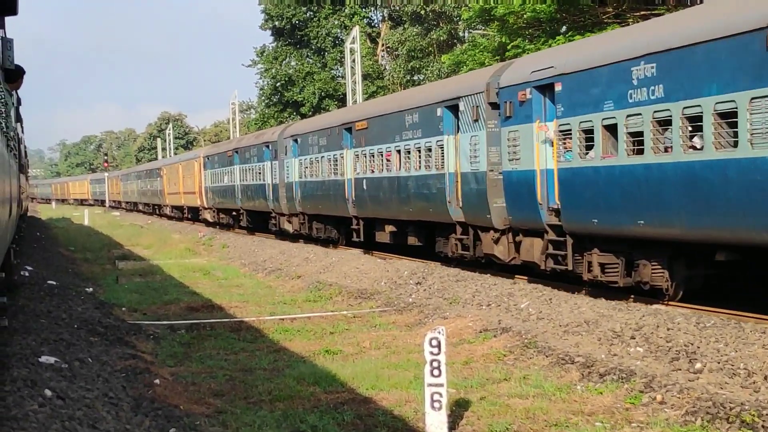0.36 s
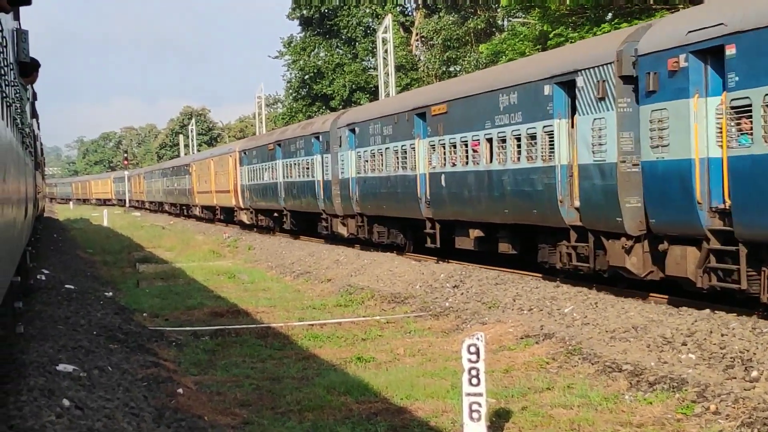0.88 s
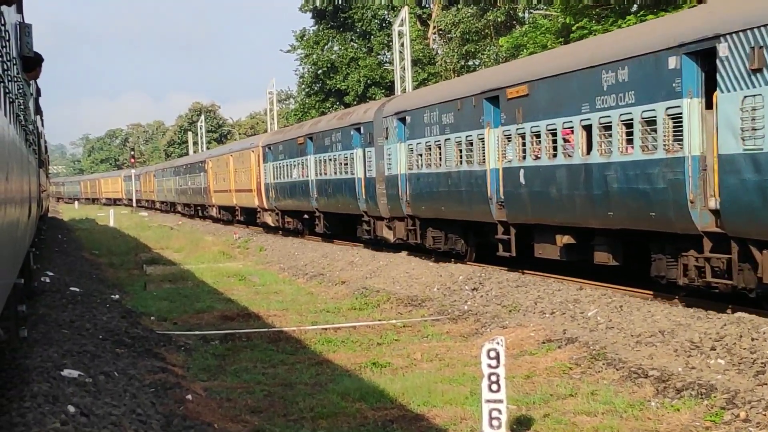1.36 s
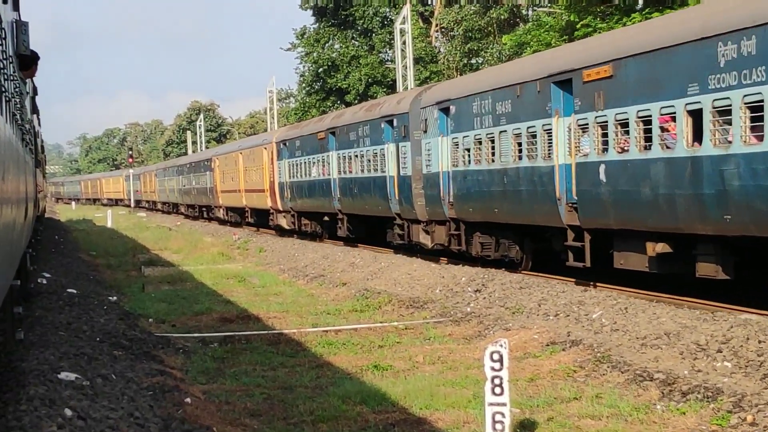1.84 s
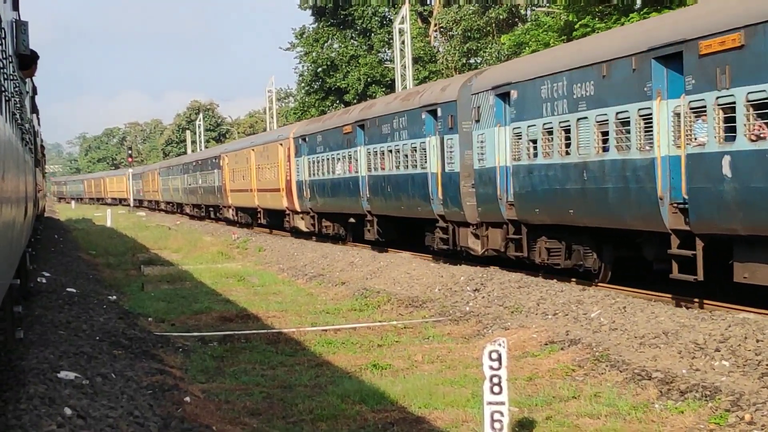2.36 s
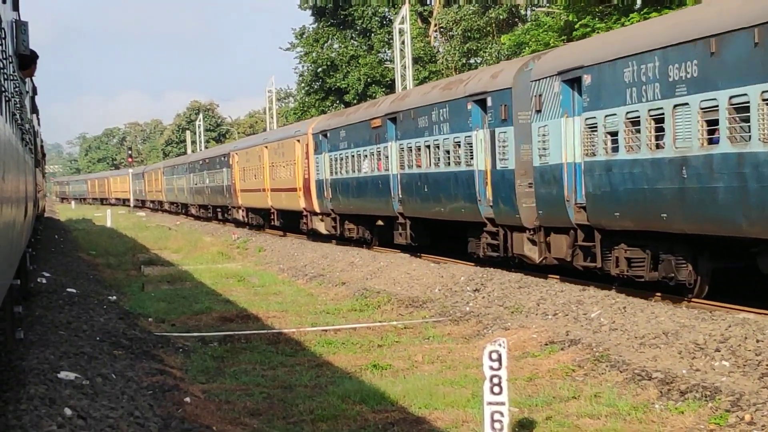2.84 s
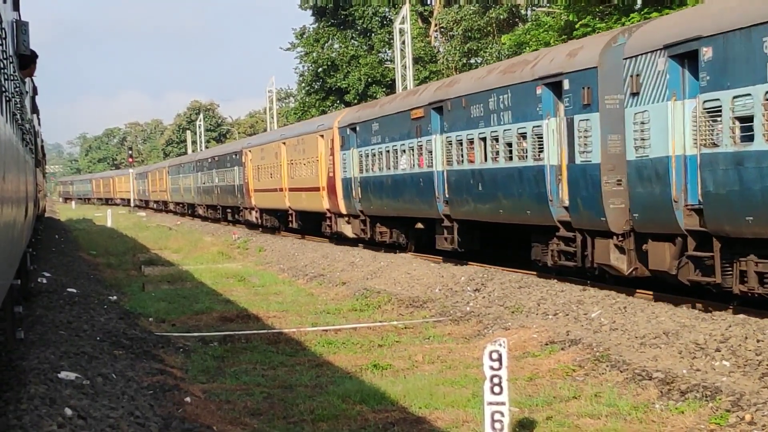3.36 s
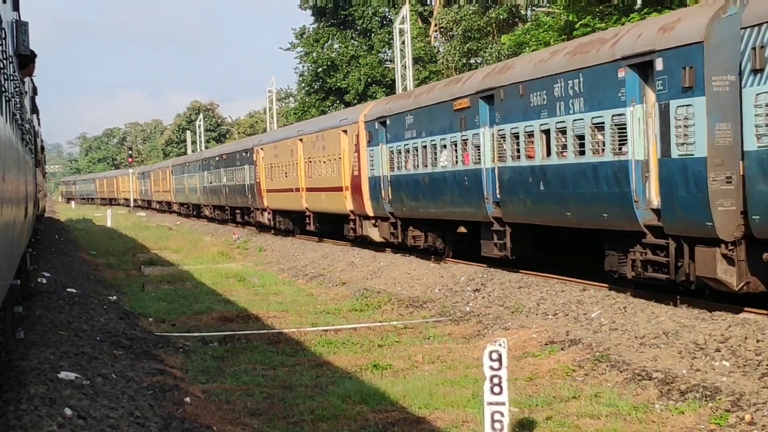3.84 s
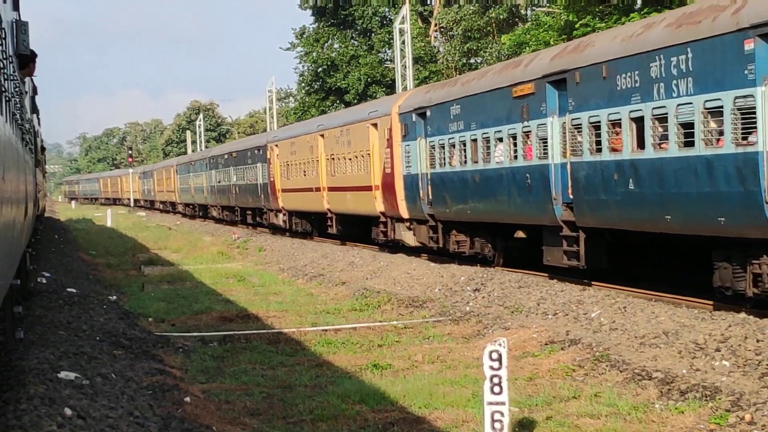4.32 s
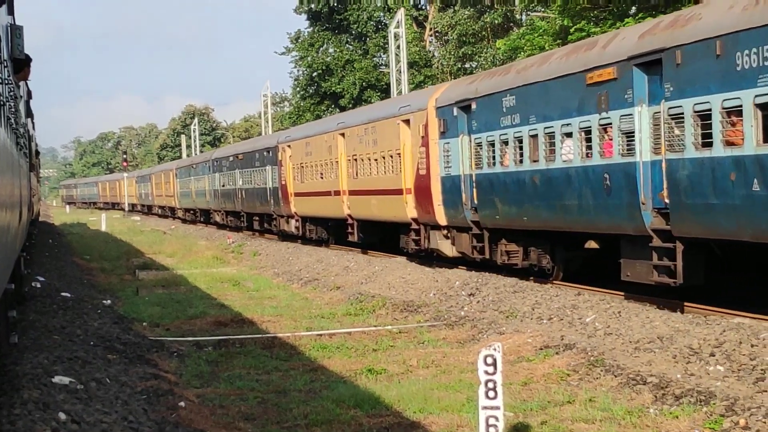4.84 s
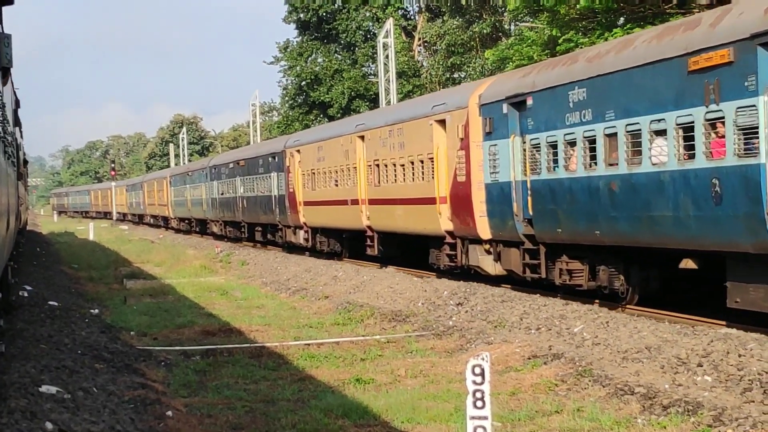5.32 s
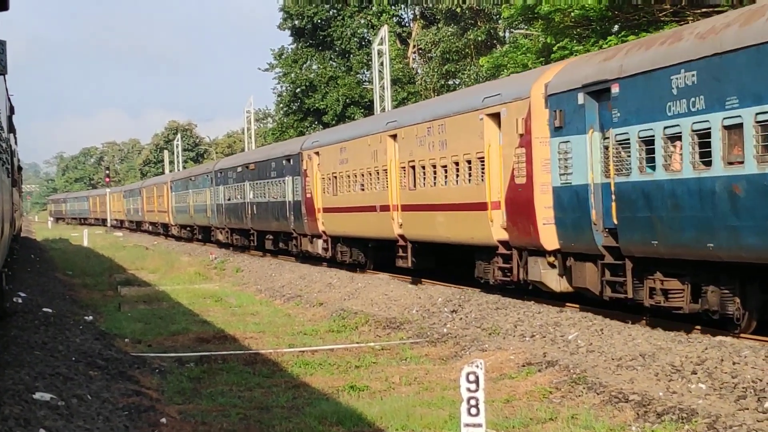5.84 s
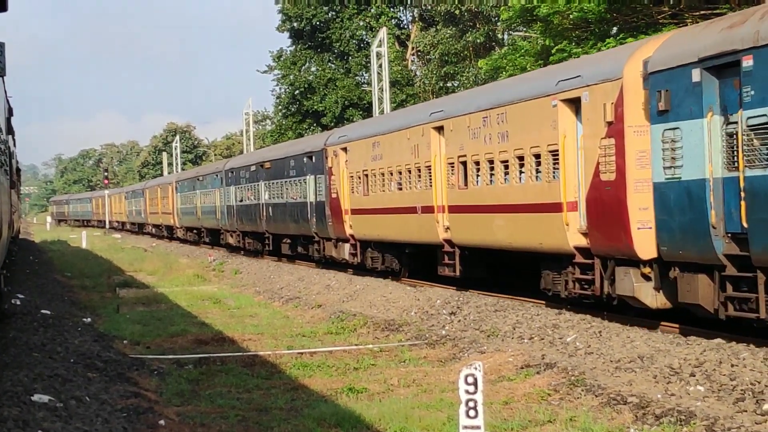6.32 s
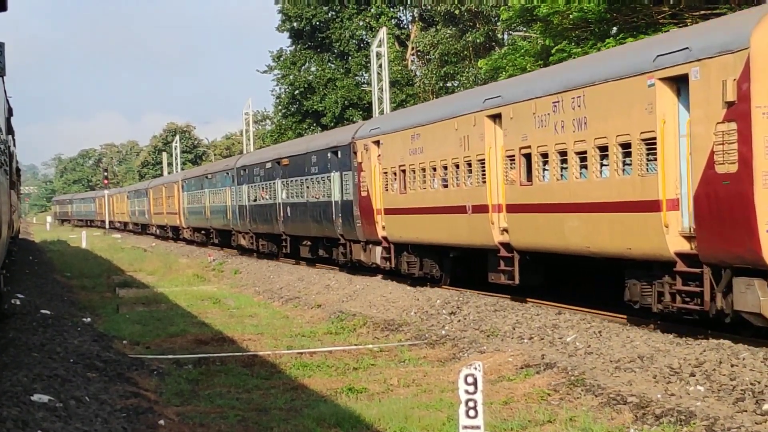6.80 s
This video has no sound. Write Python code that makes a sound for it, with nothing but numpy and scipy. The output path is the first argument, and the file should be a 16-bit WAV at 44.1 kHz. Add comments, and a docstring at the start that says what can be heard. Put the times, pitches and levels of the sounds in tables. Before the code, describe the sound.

Close clatter of a slow train passing: paired deep thumps at rail joints, metallic rattles, small clinks and pings over continuous rolling rumble.

```python
"""Door of a standing train: passenger coaches roll slowly along the next track.
Each axle thumps over three rail joints (swelling resonances), strikes a wheel, rings the rail and shakes
a rattle out of the bogie (shaped noise). Knocks, ticks, clinks and short pitched pings come besides.
Under the blows, noise rumbles, growls and hisses the same way under every coach, with a rail hum.
Two microphone ports, the right one nearer."""
import sys
import numpy as np
from scipy import signal
from scipy.fft import rfft, irfft, next_fast_len
from scipy.io import wavfile
from scipy.ndimage import uniform_filter1d

SR = 44100
rng = np.random.default_rng(int(sys.argv[2]) if len(sys.argv) > 2 else 0)


def file_out(sig):
    """Save sig as 16-bit WAV at sys.argv[1]."""
    # one column per channel
    cols = np.atleast_2d(sig).T
    # limit, then scale
    lim = np.clip(cols, -1, 1)
    pcm = np.round(lim * 32767).astype(np.int16)
    wavfile.write(sys.argv[1], SR, pcm)


def gain_from_db(level_db):
    """Turn a decibel level (scalar or array-like) into a linear amplitude factor."""
    decades = np.asarray(level_db, float) / 20
    return 10 ** decades


N = 317079
M = next_fast_len(N)
HZ = np.arange(M // 2 + 1) * SR / M + 1e-3  # offset keeps log(0) away
TIME_S = np.arange(N) / SR

# train geometry: coach to coach; axle to axle in a bogie; bogie to bogie across a coupling
COACH_M, WHEELBASE_M, COUPLING_M = 22.3, 2.906, 7.51
SPEED_M_S, SLOWING_M_S2 = 8.2397, 0.01483
TRAVEL_M = SPEED_M_S * TIME_S - SLOWING_M_S2 * TIME_S ** 2 / 2

# offset of each axle in turn: thump_db, metal_db
AXLE_OFFSETS = [(0.1, 0.3), (0.1, 0), (0.1, -0.2), (0.1, 0), (0.1, -0.9), (0.1, 0.8), (0.1, 1), (0.1, -0.2),
                (0.1, 0), (0.1, 0.1), (0.1, 0), (0.1, 0)]
# travel until the first axle meets each joint (sharp, dipped, farther off): travel_m
JOINT_TRAVEL = [9.093, -3.889, 5.679]
# per joint, blow under the four axles around a coupling: thump_db, clang_db, rattle_db
JOINT_BLOWS = [
    [(-13.5, -27.5, -29.5), (-15, -27, -27.5), (-17, -26.5, -27.5), (-17, -24, -25.5)],
    [(-11, -29, -29), (-8.5, -38, -32), (-12, -30, -31), (-11.5, -34, -33)],
    [(-18, -33.5, -32.5), (-16, -36, -36), (-26, -33, -33.5), (-14.5, -33.5, -36)],
]
# per joint, track resonances: pitch_hz, level_db, swell_ms, steepness, start_after_axle_ms,
# leading_axle_pitch_ratio [1]; times hold at pitch ratio 1
TRACK_MODES = [
    [(123, 8, 8.6, 6.2, 5.22, 1), (34.8, -3.5, 13.4, 0.47, 3, 0.835), (281, -6, 5.7, 2.7, 3.77, 0.84),
     (135, -3, 7.9, 1.9, 37.9, 1)],
    [(125.6, 0.5, 20.3, 3.6, -8.5, 1.15), (56, -2.5, 12.6, 7.9, -26.5, 1.09),
     (35.8, -2.5, 28.6, 2.1, -14.5, 0.93), (254.6, -12, 13, 2.8, -8.5, 0.967),
     (84, -15.5, 12, 1.7, -16.5, 0.97)],
    [(135, -2, 11, 8.4, 6.6, 0.92), (45.3, -6.5, 51, 0.83, 1.5, 0.33)],
]
# per joint, bogie rattle: start_after_axle_ms, rise_ms, crack_ms, shake_ms, shake_db
BOGIE_SHAKE = [(-1, 4.6, 4.3, 67, -3), (-16, 21, 22, 58.6, 0), (-20.5, 13, 8, 90, -2)]
# per joint, start of the rail clang: after_axle_ms
CLANG_START = [4.1, -12.5, 0]
# rail clang envelope: rise_ms, crack_ms, shake_ms, shake_db
CLANG_ENVELOPE = (-4, 21.5, 35, -0.5)
# rail and wheel ring in the clang noise: centre_hz, width_hz, level_db
CLANG_MODES = [(220, 110, 8.5), (286, 25, 4.5), (568, 115, -4.5), (646, 74, -15), (850, 120, -47)]
# modes of a struck wheel: pitch_hz, level_over_clang_db, t60_s
WHEEL_MODES = [(295.8, -4.5, 0.21), (546.4, 0.5, 0.27), (632, 1, 0.098), (857, -6, 0.074),
               (1936, -12.5, 0.29), (2377, -18, 0.54), (3260, -28, 0.22)]
# per joint, strength of the rim strike; the sharp joint is hardest: level_db
RIM_LEVEL = [0, -12, -8.5]
# lighter knocks from under the coaches: start_s, thump_db, rattle_db
UNDERFLOOR_KNOCKS = [(0.05, -17, -29.5), (0.634, -22, -29), (1.338, -18, -41), (1.619, -18, -45),
                     (2.196, -22, -39), (2.752, -19, -46), (3.1, -16.5, -26.5), (4.564, -18, -32.5),
                     (5.48, -15, -47), (5.813, -17.5, -41), (6.44, -24, -44), (6.796, -21.5, -50)]
# bright ticks of loose metal: time_s, level_db
METAL_TICKS = [(0.7023, -19), (0.798, -14.5), (1.11, -11), (1.5094, -19), (2.2393, -24.5), (3.1597, -18),
               (3.821, -14.5), (4.5514, -25), (4.742, -14), (5.886, -13.5), (6.2437, -19.5)]
# short pitched pings: start_s, pitch_hz, level_db, t60_ms
PITCHED_PINGS = [(.442, 5900, -38, 37), (.575, 7400, -40, 90), (.60, 7300, -34, 50), (.702, 7380, -29, 60),
                 (.715, 8050, -36, 50), (.798, 6550, -34, 40), (1.11, 2150, -29, 60),
                 (1.466, 6000, -26, 50), (2.2, 890, -36, 120), (2.243, 3500, -33, 50),
                 (2.419, 1110, -40, 250), (2.465, 507, -34, 150), (3.405, 920, -29, 120),
                 (3.49, 720, -32, 70), (4.675, 7500, -31, 50), (4.745, 3600, -32, 60),
                 (4.849, 1120, -40, 150), (4.965, 3900, -28, 50), (5.0, 3750, -35, 50),
                 (5.10, 850, -23, 110)]
# rattle spectrum: frequency_hz, density_db_per_hz
RATTLE_SPECTRUM = [(600, -27), (950, -0.5), (1400, -4), (1750, -5.5), (2100, 1), (2600, -0.5), (3000, -1.5),
                   (4200, 2), (5200, -1.5), (6800, 1), (7800, -2), (9000, -8), (13200, -16)]
# narrow-band tonal grain in the rattle: share [0-1], per_s, t60_ms (at 2 kHz), spread_db
RATTLE_GRAIN = dict(share=.3, per_s=900, t60_ms=50, spread_db=1.2)
# rolling spectrum: frequency_hz, density_db_per_hz
ROLL_SPECTRUM = [(15, -25), (28, -14), (50, -3.5), (78, 0), (290, -23.5), (390, -26.5), (600, -28),
                 (1400, -33.5), (2100, -25), (2850, -27.5), (5500, -31), (7200, -29.5), (9200, -38.5),
                 (12000, -39.5), (13200, -50)]
# narrow-band tonal grain in the rolling noise: share [0-1], per_s, t60_ms (at 2 kHz), spread_db
ROLL_GRAIN = dict(share=.22, per_s=500, t60_ms=90, spread_db=1.0)
# ballast resonances in the rolling noise: centre_hz, width_hz, lift_db
BALLAST_MODES = [(53.3, 7.4, 6), (63.3, 8.4, 3), (69.4, 4.8, 3), (124.5, 60, -2.5), (164.3, 14.5, 4.5)]
# rolling level, repeating with every coach: place_in_coach_m, rumble_db, growl_db, hiss_db
COACH_LEVELS = [(0.2, -28, -35.5, -38), (2.45, -26, -37.5, -38), (4.87, -25.5, -35.5, -39),
                (6.7, -21, -36.5, -38.5), (7.63, -22, -36, -38), (9.5, -29, -33.5, -35),
                (10.24, -26, -37, -38), (12.9, -27.5, -34, -39.5), (13.55, -21.5, -40, -39.5),
                (15.03, -26, -34.5, -38.5), (16.8, -22.5, -34, -36), (17.3, -27.5, -34.5, -38.5),
                (20.4, -18.5, -36.5, -33.5), (20, -31.5, -36.5, -43.5)]
# rail hum level: time_s, level_db
HUM_LEVEL = [(0, -53), (0.8, -42.5), (1.4, -62), (3.1, -51.5), (3.8, -45.5), (5.3, -47.5), (5.9, -40),
             (6.4, -39.5), (6.7, -48), (7.19, -48.5)]
# pitch range of the tonal grain: lowest_hz, highest_hz
GRAIN_RANGE = 350, 13000
# noise common to both ports: frequency_hz, share [0-1]
PORT_LIKENESS = [(30, 1), (60, 0.99), (150, 1), (300, 0.81), (600, 0.68), (1200, 0.39), (2500, 0),
                 (6000, 0)]
# port colour: frequency_hz, left_minus_right_db
PORT_BALANCE = [(60, -1.5), (110, -0.5), (200, 1), (370, -1.5), (670, -2), (1230, 0), (2250, -2),
                (4120, -3.0), (7540, -9.5), (13800, 9)]
# left port delay: frequency_hz, lag_samples
PORT_LAG = [(500, 8), (1200, 18.45)]


def read(points, hz=HZ):
    """A table of frequency and value, read on a log-frequency axis."""
    table_hz, values = np.transpose(points)
    return np.interp(np.log(hz), np.log(table_hz), values)


def unit(x):
    """Scale to rms 1."""
    return x / np.sqrt(np.mean(x ** 2))


def add(line, start_s, shape):
    """Lay a shape into a line from start_s on."""
    i = int(start_s * SR)
    line[i:min(i + len(shape), N)] += shape[:max(N - i, 0)]


def walk(rate_hz):
    """Random levels held 1 / rate_hz seconds, smoothed twice; rms 1."""
    hold = int(SR / rate_hz)
    steps = np.repeat(rng.standard_normal(N // hold + 1), hold)
    return unit(uniform_filter1d(uniform_filter1d(steps, hold), hold)[:N])


def lagged(spectra):
    """Spectra to two channels; sound reaches the left port later."""
    lag_s = np.outer([1, 0], read(PORT_LAG)) / SR
    return irfft(spectra * np.exp(-2j * np.pi * lag_s * HZ), M)[:, :N]


def noise():
    """Spectra of a noise pair: alike in the bass, more and more unrelated in the treble."""
    shared, left, right = rfft(rng.standard_normal((3, M)))
    like = np.clip(read(PORT_LIKENESS), 0, 1)
    return np.sqrt(like) * shared + np.sqrt(1 - like) * np.array([left, right])


def decaying_sine(hz, t60_ms):
    """A sine with a quick rise and an exponential decay, ended 40 dB down."""
    t = np.arange(int(t60_ms * SR / 1500)) / SR
    return (1 - np.exp(-t / 0.0014)) * gain_from_db(-60000 * t / t60_ms) * np.sin(2 * np.pi * hz * t)


def grainy_noise(share, per_s, t60_ms, spread_db):
    """Spectra of a noise pair with a share of its power in short decaying sines."""
    low_hz, high_hz = GRAIN_RANGE
    when, pitch, size, side, late = rng.random((int(per_s * N / SR), 5)).T
    start_s = when * N / SR
    hz = low_hz * (high_hz / low_hz) ** pitch
    gain = np.sqrt(hz) * gain_from_db(-spread_db * np.log(1 - size))
    angle = side * np.pi / 2
    grain = np.zeros((2, M))
    for s, f, g, a, d in zip(start_s, hz, gain, angle, late):
        shape = g * decaying_sine(f, t60_ms * (2000 / f) ** 0.29)  # lower sines last longer
        add(grain[0], s + d * 0.0008, np.cos(a) * shape)
        add(grain[1], s, np.sin(a) * shape)
    share = share * (HZ > low_hz)
    grain_gain = np.sqrt(share * 2 * high_hz / SR)
    return np.sqrt(1 - share) * noise() + grain_gain * rfft(unit(grain))


def octaves(pair, low_hz, count, flicker_db, rate_hz):
    """Overlapping octave bands from low_hz up, each flickering alone."""
    bands = []
    for k in range(count):
        window = np.cos(np.pi / 2 * np.clip(np.log2(HZ / low_hz) - k, -1, 1)) ** 2
        bands.append(lagged(pair * window) * gain_from_db(flicker_db * walk(rate_hz)))
    return bands


def shake(rise_ms, crack_ms, shake_ms, shake_db):
    """Power of metal noise: a crack, then loose parts shaking until they settle."""
    t_ms = np.arange(int(0.3 * SR)) * 1000 / SR
    settling = np.exp(-(t_ms / shake_ms) ** 2.1)  # exponent over 1: ends more abruptly
    decay = np.exp(-t_ms / crack_ms) + gain_from_db(shake_db) ** 2 * settling
    return (1 - np.exp(-(t_ms / rise_ms) ** 2)) * decay


def thump(hz, swell_ms, steepness):
    """A resonance fed through other resonances: it swells to its peak, then dies."""
    t = np.arange(int(0.25 * SR)) / SR
    u = 1000 * t / swell_ms
    return (u * np.exp(1 - u)) ** steepness * np.sin(2 * np.pi * hz * t)


def rail_hum():
    """Noise through a narrow rail resonance, its level rising and falling."""
    centre_hz, width_hz = 294, 14
    hum = lagged(noise() / (1 + 2j * (HZ - centre_hz) / width_hz) ** 2)
    return unit(hum) * gain_from_db(np.interp(TIME_S, *np.transpose(HUM_LEVEL)))


def rolling():
    """Rough wheels on rough rail: rumble through the ballast, growl of the rail, hiss of the treads."""
    lift_db = sum(db / (1 + (2 * (HZ - hz) / width) ** 2) for hz, width, db in BALLAST_MODES)
    pair = grainy_noise(**ROLL_GRAIN) * gain_from_db(read(ROLL_SPECTRUM) + lift_db)
    bands = octaves(pair, 31.07, count=10, flicker_db=1.84, rate_hz=14)
    layers = sum(bands[:3]), sum(bands[3:6]), sum(bands[6:])  # rumble, growl, hiss
    place_m, *levels_db = np.transpose(COACH_LEVELS)
    mix = np.zeros((2, N))
    for layer, db in zip(layers, levels_db):
        mix += unit(layer) * gain_from_db(np.interp(TRAVEL_M, place_m, db, period=COACH_M))
    return mix


def clinks(rattle_power):
    """Faint clinks of loose parts at random times; level excess is exponential in dB."""
    per_s, least_db, mean_excess_db = 30, -49, 3
    for when, size in rng.random((int(per_s * N / SR), 2)):
        db = least_db - mean_excess_db * np.log(1 - size)
        add(rattle_power, when * N / SR, gain_from_db(db) ** 2 * shake(4.0, 5.2, 20, -7.0))


def ticks(rattle_power):
    """Loose metal ticks: short, bright bursts of rattle."""
    for s, db in METAL_TICKS:
        add(rattle_power, s - 0.002, gain_from_db(db) ** 2 * shake(6.5, 1.5, 12.7, -12.5))


def pings(tones):
    """Short pitched pings, each a decaying sine."""
    for s, hz, db, t60_ms in PITCHED_PINGS:
        add(tones, s, gain_from_db(db) * decaying_sine(hz, t60_ms))


def knocks(tones, rattle_power):
    """Lighter knocks under the coaches: one low resonance and a little rattle."""
    for s, thump_db, rattle_db in UNDERFLOOR_KNOCKS:
        add(tones, s, gain_from_db(thump_db) * thump(117.7, 6.0, 0.98))
        add(rattle_power, s, gain_from_db(rattle_db) ** 2 * shake(7.2, 2.5, 42, -8.5))


def rattle(power):
    """Metal noise of loose parts of many sizes: each octave comes in its own lumps."""
    pair = grainy_noise(**RATTLE_GRAIN) * gain_from_db(read(RATTLE_SPECTRUM))
    parts = octaves(pair, 980, count=5, flicker_db=0.9, rate_hz=60)
    lump_db = 1.5 * walk(75)
    return np.sqrt(power) * gain_from_db(lump_db) * unit(sum(parts))


def clang(power):
    """Noise through rail and wheel resonances, its level uneven."""
    modes = sum(gain_from_db(db) / (1 + 2j * (HZ - hz) / width) for hz, width, db in CLANG_MODES)
    flicker_db = 2.2 * walk(90)
    return np.sqrt(power) * gain_from_db(flicker_db) * unit(lagged(noise() * modes))


def wheel(detune, spread_db):
    """A wheel struck on the rim: decaying modes, varied a little at random with every strike."""
    hz, db, t60_s = np.transpose(WHEEL_MODES)[:, :, None]
    tune, size = rng.standard_normal((2, len(WHEEL_MODES), 1))
    t = np.arange(int(0.3 * SR)) / SR
    decay = gain_from_db(db + spread_db * size - 60 * t / t60_s)
    modes = decay * np.sin(2 * np.pi * hz * (1 + detune * tune) * t)
    return (1 - np.exp(-t / 0.0013)) * np.sum(modes, axis=0)


def crossings(joint_m, blows):
    """(place around the coupling, s, thump dB, clang dB, rattle dB) of every axle meeting the joint."""
    place_m = 0, WHEELBASE_M, COUPLING_M, COUPLING_M + WHEELBASE_M
    for n, (thump_db, metal_db) in enumerate(AXLE_OFFSETS):
        coach, k = divmod(n, len(place_m))
        m = joint_m + coach * COACH_M + place_m[k]
        if TRAVEL_M[0] < m < TRAVEL_M[-1]:
            yield k, np.interp(m, TRAVEL_M, TIME_S), *np.add(blows[k], (thump_db, metal_db, metal_db))


def track_thump(tones, axle_s, thump_db, modes, leading):
    """Track resonances answer the axle, each time at a slightly different pitch."""
    crest_ms = 12  # this point keeps its place when a resonance is repitched
    for hz, db, swell_ms, steepness, after_ms, lead_ratio in modes:
        ratio = (lead_ratio if leading else 1) * (1 + 0.025 * rng.standard_normal())
        start_s = axle_s + (crest_ms + (after_ms - crest_ms) / ratio) / 1000
        add(tones, start_s, gain_from_db(thump_db + db) * thump(hz * ratio, swell_ms / ratio, steepness))


def joints(tones, clang_power, rattle_power):
    """Every axle gives the joint's thump, a wheel strike, a rail clang and a bogie rattle."""
    per_joint = zip(JOINT_TRAVEL, JOINT_BLOWS, TRACK_MODES, CLANG_START, RIM_LEVEL, BOGIE_SHAKE)
    for joint_m, blows, modes, clang_ms, rim_db, (rattle_ms, *form) in per_joint:
        for k, s, thump_db, clang_db, rattle_db in crossings(joint_m, blows):
            track_thump(tones, s, thump_db, modes, leading=k % 2 == 0)
            clang_s = s + clang_ms / 1000
            add(tones, clang_s, gain_from_db(clang_db + rim_db) * wheel(detune=0.02, spread_db=4.0))
            add(clang_power, clang_s, gain_from_db(clang_db) ** 2 * shake(*CLANG_ENVELOPE))
            add(rattle_power, s + rattle_ms / 1000, gain_from_db(rattle_db) ** 2 * shake(*form))


def scene():
    """Blows at the joints, loose metal and pings over the rolling noise."""
    background = rolling() + rail_hum()
    tones, clang_power, rattle_power = np.zeros((3, N))
    clinks(rattle_power)
    ticks(rattle_power)
    pings(tones)
    knocks(tones, rattle_power)
    joints(tones, clang_power, rattle_power)
    return background + rattle(rattle_power) + clang(clang_power) + lagged(rfft(tones, M))


def top_cut(x):
    """Nothing passes above the cut-off."""
    return signal.sosfilt(signal.butter(12, 14400, fs=SR, output="sos"), x)


def record(dry):
    """Microphone ports: the loudest crests are rounded, the ports differ in colour, the top is cut."""
    top_hz = 13250
    rounded = np.tanh(1.296 * dry) / 1.275
    colour = gain_from_db(np.outer([0.5, -0.5], read(PORT_BALANCE))) * (HZ < top_hz)
    mix = irfft(rfft(rounded, M) * colour, M)[:, :N]
    return top_cut(mix)


dry = scene()
out = record(dry)
file_out(out)
```